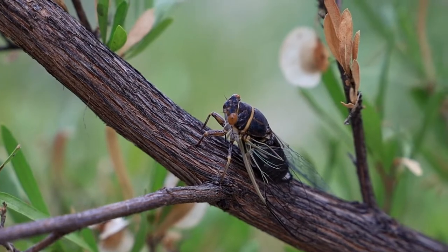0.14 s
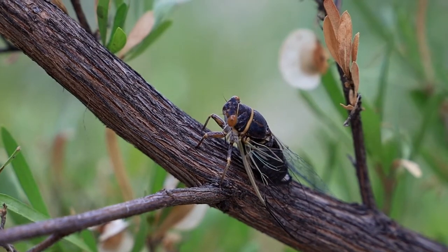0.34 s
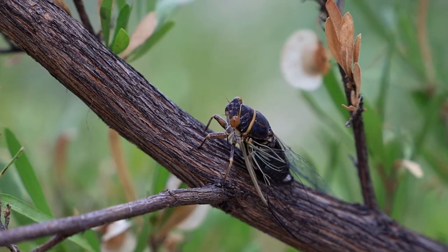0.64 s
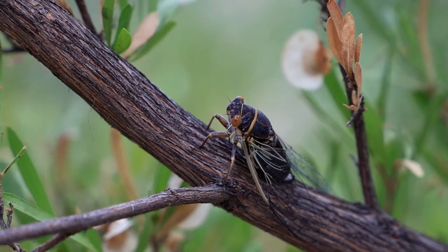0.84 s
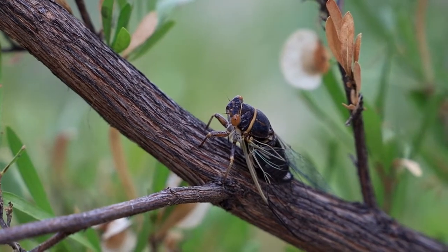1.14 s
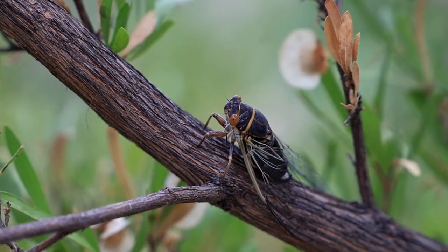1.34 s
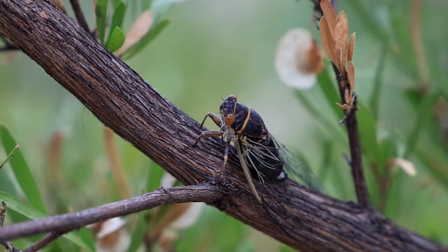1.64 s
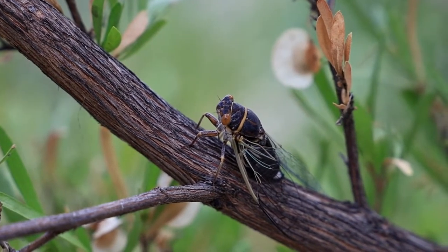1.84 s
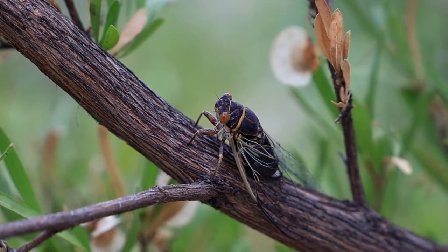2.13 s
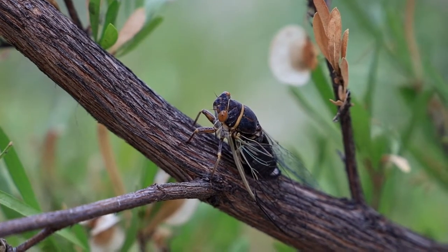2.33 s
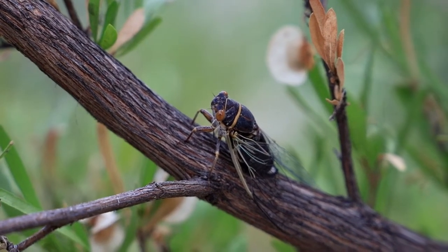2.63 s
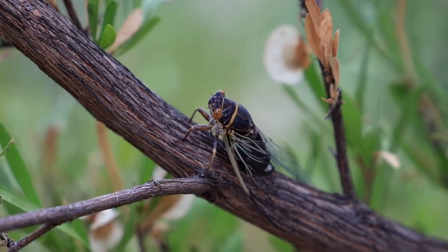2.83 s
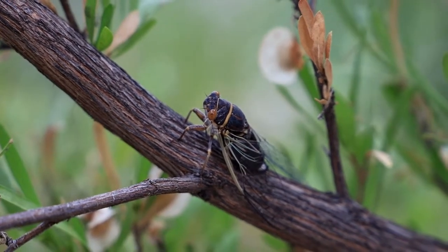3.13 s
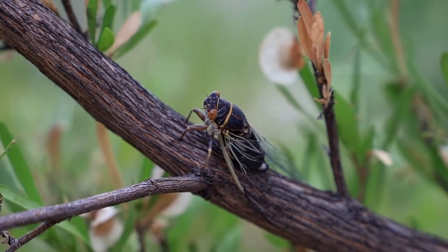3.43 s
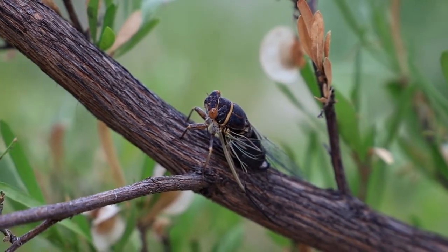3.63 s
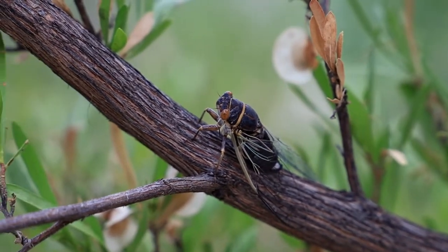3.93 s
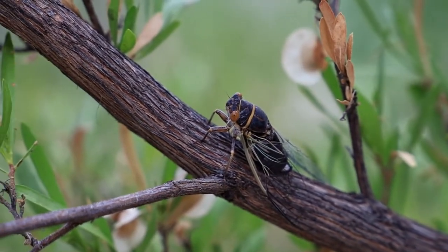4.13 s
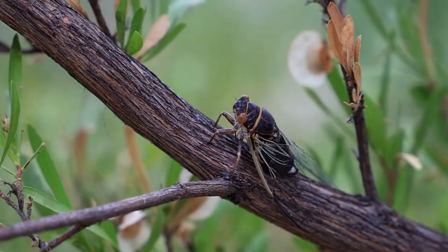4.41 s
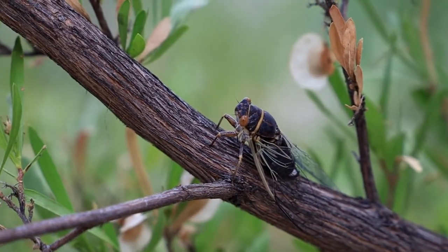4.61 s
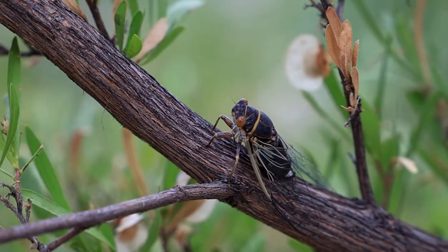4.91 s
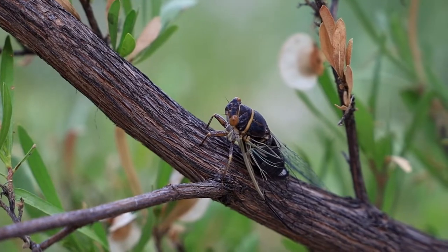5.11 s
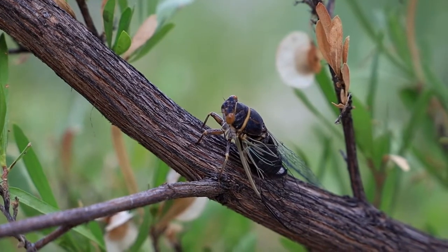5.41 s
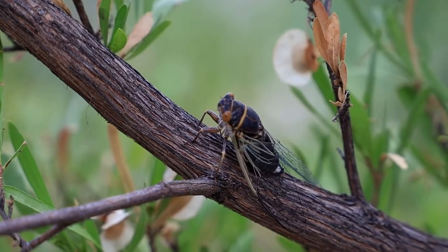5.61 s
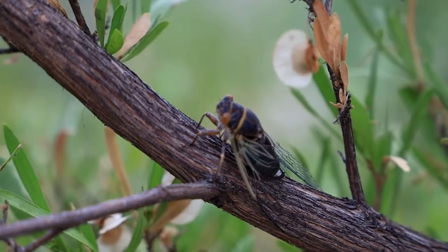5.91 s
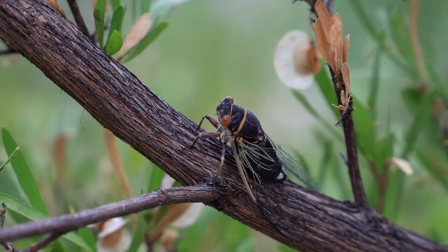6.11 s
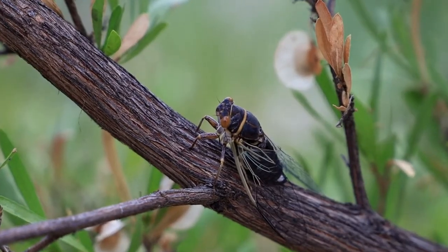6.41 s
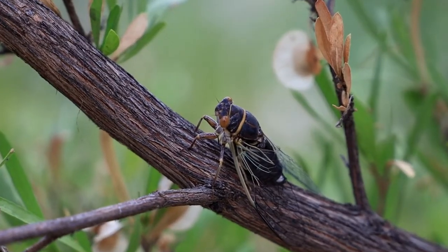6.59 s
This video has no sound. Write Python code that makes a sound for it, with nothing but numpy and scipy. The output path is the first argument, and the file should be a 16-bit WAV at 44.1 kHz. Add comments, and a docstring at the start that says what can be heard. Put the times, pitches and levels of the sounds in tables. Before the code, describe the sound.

Steady high-pitched cicada drone nearby, roughened by quickening ticks, drops to a softer dry rattle after four and a half seconds, then surges back very loud.

```python
"""Cicada among shrubs

A cicada sings close by: its tymbal, a ribbed drum skin, buckles about 157 times a second. Held taut it gives
one shrill snap a beat, with slack stutters that come ever faster. It relaxes into a lower, quieter rattle of
separate ribs, then tightens until the abdomen rings loudly. Each click is a sudden start with ringing resonances.
Leaves and twigs scatter the sound. Behind it: a faint second cicada, a soft rush, two dove coos, rumble and air.
"""
import sys
import numpy as np
from scipy import signal
from scipy.fft import rfft, irfft
from scipy.io import wavfile
from scipy.ndimage import uniform_filter1d

SR = 44100
rng = np.random.default_rng(int(sys.argv[2]) if len(sys.argv) > 2 else 0)


def digitize_waveform(pressure):
    """Quantize a signal to 16-bit integers and store it at the path in sys.argv[1].

    Rows of a 2-D input are taken as channels; values are limited to [-1, 1].
    """
    field = np.atleast_2d(pressure).T
    bounded = np.clip(field, -1, 1)
    quanta = np.round(bounded * 32767).astype(np.int16)
    wavfile.write(sys.argv[1], SR, quanta)


N = 297675
TIME = np.arange(N) / SR
MS = .001   # one millisecond in seconds
# the frequencies at which a short click is described
CLICK_HZ = np.arange(257) * SR / 512
# the moment at which the air sac, and the ribs with it, catches (s)
CATCH_S = 5.45

# Pace of the tymbal muscle, which slows as the tymbal relaxes. Each row: time in seconds, beats per second.
BEAT_RATE = [(0, 157.57), (2, 157.25), (3.6, 157.3), (4.35, 156.07), (4.6, 153.23), (4.75, 144.37),
             (4.9, 148.83), (6.1, 156.45), (6.75, 156.81)]
# Loudness of the taut song before its trim. Each row: time in seconds, level in dB.
TAUT_LEVEL = [(0.02, -36.5), (0.47, -36.5), (2.44, -36.5), (4.14, -36), (4.545, -37), (4.56, -43.5),
              (4.6, -42.5)]
# Ribs that buckle in turn on a slack beat. Each row: delay in ms before the span factor, then the level in dB
# relative to the beat when slack, after the catch and when tight, then a pitch factor.
RIB_ORDER = [(0, -0.5, 0.5, -11, 0.96), (.75, -7.5, -17, -39, 1), (1.721, -3.5, -3.5, -10, 0.914),
             (2.619, -3, -2.5, 1.5, 0.98), (3.3, -6, -13, -1.5, 0.878)]
# The gaps between the ribs close steadily. Each row: time in seconds, factor on the rib delays.
RIB_GAPS = [(4.65, 1.1), (5.0, 1.06), (5.35, .94), (5.45, .87), (5.55, .77), (5.75, .67), (6.0, .58),
            (6.25, .52), (6.6, .5)]


def taut_song(beat_s, level_db, uneven_db, waver):
    """One shrill snap a beat, each much like the last, and lone snaps after the tymbal has relaxed."""
    # Lone taut snaps. Each row: time in seconds, level in dB.
    stray_snaps = [(4.639, -38), (4.868, -46)]
    s = during(TAUT_LEVEL, beat_s)
    chance = rng.standard_normal((len(s), 2))
    db = at_time(TAUT_LEVEL, s)[0] + level_db + uneven_db * chance[:, 0]
    song = snaps(s, db, 1 + waver * chance[:, 1])
    stray_s, stray_db = np.transpose(stray_snaps)
    return song + snaps(stray_s, stray_db, np.ones(len(stray_s)))


def snaps(s, level_db, pitch):
    """Clicks of the taut tymbal: a broad crack with drifting resonances on top."""
    # Colour of the crack, before the pitch factor. Each row: frequency in Hz, relative level in dB.
    crack_colour = [(150, -44), (600, -42), (2200, -44.5), (3000, -92), (4200, -43), (5500, -40),
                    (7500, -19), (10000, -18), (12000, -39), (15800, -44.5)]
    # Resonances of the taut tymbal, which drift as it tires. Each row: Hz at first, Hz at last, width in Hz,
    # relative dB at first, dB at last, left-right balance in dB at first, at last.
    tymbal_modes = [(7180, 6955, 496, -1.7, -15, -6.5, -12.5), (7390, 7670, 310, 2, -9.5, 2.5, -6),
                    (8470, 8290, 470, 2, -7, 5, 1.5), (8680, 8840, 540, 4.5, -3, 3.5, 0),
                    (9040, 9440, 610, 7.5, -4, -2.5, -5.5), (9950, 10620, 540, 5.5, -4.5, 1.5, -2.5),
                    (11000, 9400, 460, -7, -20, 8.5, -1), (10820, 11760, 720, 2, -20.5, -5, -15),
                    (12040, 12400, 970, -10.5, -30, -10.5, -12), (14200, 14000, 1300, -17, -32, -2, -1)]
    # How much earlier the left side hears a snap. Each row: frequency in Hz, phase in radians.
    snap_lead = [(4000, 0), (5200, -1.5), (6300, -0.7), (7000, 1.38), (7800, 2.5), (8900, 0.93),
                 (10000, 1.69), (11400, 1.07), (12200, 3.5), (14200, 4.5), (15800, 7)]
    hz = CLICK_HZ / pitch[:, None]
    crack = from_db(at_hz(crack_colour, hz)) ** 2
    ringing = drifting(tymbal_modes, hz, s / TAUT_LEVEL[-1][0])
    return clicks(s, level_db, crack + ringing, snap_lead)


def stutters(level_db, span, scatter_ms):
    """Slack beats that break into the taut song, ever closer together."""
    # The stutters, before the small shift and the trim. Each row: time in seconds, level in dB.
    stutter_rows = [(0.1079, -38), (0.2288, -40.5), (0.364, -39.5), (0.491, -40.5), (0.622, -42.5),
                    (0.743, -41), (0.8615, -40), (0.9699, -39.5), (1.0824, -41.5), (1.1946, -42),
                    (1.3522, -42.5), (1.4486, -42), (1.5753, -41.5), (1.6904, -41.5), (1.818, -42.5),
                    (1.94, -42), (2.06, -41.5), (2.1552, -42), (2.2501, -40.5), (2.3575, -42),
                    (2.4596, -43), (2.5743, -41.5), (2.6953, -41), (2.798, -42.5), (2.8973, -42.5),
                    (2.9943, -41.5), (3.077, -42.5), (3.1595, -43), (3.249, -44), (3.3317, -43),
                    (3.413, -43), (3.49, -42.5), (3.5844, -42), (3.6625, -41.5), (3.7118, -45.5),
                    (3.7327, -47), (3.7833, -44), (3.8043, -45), (3.846, -45), (3.873, -43.5),
                    (3.894, -42.5), (3.9245, -46), (3.9364, -47), (3.9504, -45.5), (3.9777, -45),
                    (4.0002, -41.5), (4.0386, -44), (4.071, -42.5), (4.106, -43), (4.124, -45),
                    (4.143, -45), (4.169, -44.5), (4.1923, -43), (4.2073, -45), (4.223, -44), (4.251, -44),
                    (4.275, -42.5), (4.3091, -44), (4.3082, -44), (4.3395, -43), (4.3614, -46),
                    (4.383, -43.5), (4.4124, -42.5), (4.4278, -47), (4.439, -44), (4.462, -41),
                    (4.4907, -44), (4.5032, -44), (4.534, -42), (4.552, -41)]
    s, db = np.transpose(stutter_rows)
    # a stutter sounds lower than a rib of the steady rattle
    return rattle(s - 0.31 * MS, db + level_db, span, scatter_ms, uneven_db=1.5, waver=0.027, pitch=.95)


def slack_song(beat_s, level_db):
    """The rattle on every beat as the tymbal relaxes; the closing gaps sweep bands up through its spectrum."""
    # Loudness of the rattle, which takes over as the taut song ends. Each row: time in seconds, level in dB.
    slack_level = [(4.2, -55), (4.44, -52.5), (4.56, -49.5), (4.61, -46), (4.66, -44), (4.8, -43.5),
                   (5.0, -42), (5.3, -40.5), (5.55, -38.5), (5.8, -37), (6.0, -37.5), (6.2, -40.5),
                   (6.75, -40.5)]
    # The timing firms up as the play between the ribs dies away. Each row: time in seconds, scatter in ms
    # for a rib that is 1 ms late (it grows with the square root of the delay).
    rib_scatter = [(4.2, .08), (4.6, .045), (4.85, .026), (5.4, .021), (5.8, .016), (6.2, .01)]
    s = during(slack_level, beat_s)
    db = at_time(slack_level, s)[0] + level_db
    span = at_time(RIB_GAPS, s)[0]
    scatter_ms = at_time(rib_scatter, s)[0]
    return rattle(s, db, span, scatter_ms, uneven_db=1.2, waver=.004, pitch=rib_pitch_at(tension_at(s)))


def rattle(s, level_db, span, scatter_ms, uneven_db, waver, pitch):
    """On a slack beat the ribs give way one by one, each with a click of its own."""
    # Four times in seconds: the ribs pass from slack to caught between the first two, to tight between the last two.
    stages_s = [5.32, 5.422, 5.84, 6.1]
    out = 0
    for delay_ms, slack_db, caught_db, tight_db, rib_pitch in RIB_ORDER:
        chance = rng.standard_normal((len(s), 3))
        lag_s = (delay_ms * span + scatter_ms * np.sqrt(abs(delay_ms)) * chance[:, 0]) * MS
        stage_db = np.interp(s, stages_s, [slack_db, caught_db, caught_db, tight_db])
        db = level_db + stage_db + uneven_db * chance[:, 1]
        out = out + rib_clicks(s + lag_s, db, pitch * rib_pitch * (1 + waver * chance[:, 2]))
    return out


def rib_clicks(s, level_db, pitch):
    """Duller clicks of single slack ribs: tension tunes the resonances, and in part the body's own colour."""
    # Colour of the body, before the pitch factor. Each row: frequency in Hz, relative level in dB.
    rib_colour = [(150, -72), (1200, -64), (2800, -31), (3400, -29), (4000, -17.5), (5000, -13.5),
                  (7000, 1), (9500, -2), (10500, -10.5), (11700, -20.5), (12800, -19), (14000, -24.5),
                  (15800, -26)]
    # Resonances of a rib, before the pitch factor. Each row: centre in Hz, width in Hz, relative level in dB.
    rib_modes = [(6070, 770, -1), (6500, 980, -3.5), (8520, 460, 3.5)]
    # The side towards which the ribs sound. Each row: frequency in Hz, left-right balance in dB.
    rib_balance = [(3000, 1), (5600, -3.5), (6900, -4.5), (8040, 1.5), (9740, -1), (10500, -4),
                   (12740, -12), (15000, -8)]
    # How much earlier the left side hears a rib. Each row: frequency in Hz, phase in radians.
    rib_lead = [(3800, 0), (4600, -1.46), (6400, -0.6), (8000, -1.3), (8500, -1.5), (9300, -1.4),
                (10200, -2.5), (12700, -1.5), (15000, -1)]
    body_follows = 0.36   # the colour follows the pitch factor raised to this power
    body_mode, overtone = (8200, 430, 0.92), (12900, 1200, -15.5)   # centre Hz, width Hz, dB
    hz = CLICK_HZ / pitch[:, None]
    power = from_db(at_hz(rib_colour, CLICK_HZ / pitch[:, None] ** body_follows)) ** 2
    power = power + sum(resonance(hz, *mode) for mode in rib_modes)
    # one body resonance stays put; the overtone speaks only after the catch
    power = power + resonance(CLICK_HZ, *body_mode)
    power = power + (s > CATCH_S)[:, None] * resonance(CLICK_HZ, *overtone)
    sides = panned(at_hz(rib_balance, CLICK_HZ))[:, None]
    return clicks(s, level_db, power * sides, rib_lead)


def tension_at(s):
    """The tymbal tightens at an even pace: 0 while it is slack, 1 once it is tight again."""
    start_s, length_s = 5.13, 1.36
    return np.clip((s - start_s) / length_s, 0, 1)


def rib_pitch_at(tension):
    """Tension raises the pitch of the ribs by up to 17 percent, gently at first, then faster."""
    return 1 + 0.17 * tension ** 2.2


def abdomen(beat_s, level_db, uneven_db, lag_ms):
    """As the air sac comes into tune, each beat rings it; the last ribs follow ever closer behind."""
    # Loudness of the ringing before its trim. Each row: time in seconds, level in dB.
    swell = [(5.33, -54), (5.45, -47), (5.55, -54), (5.83, -38.5), (5.88, -33), (6.0, -31.5), (6.04, -27.5),
             (6.3, -25.5), (6.75, -25)]
    # Broad colour under the resonances. Each row: frequency in Hz, relative level in dB.
    ring_colour = [(150, -62), (320, -41), (1000, -61), (3000, -56), (3800, -37.5), (5000, -42),
                   (7000, -36), (9000, -23), (11000, -31), (15800, -39.5)]
    # Resonances of the abdomen, which climb as it comes into tune. Each row: Hz at first, Hz at last, width in Hz,
    # relative dB at first, dB at last, left-right balance in dB at first, at last.
    abdomen_modes = [(3620, 4880, 320, -33, -20, -10, -6), (6000, 6490, 460, -4.5, -12, -11, -4.5),
                     (6200, 7590.0, 1150, -6.7, -15.5, -1, 0), (7700, 8220, 820, 3, 3, -0.1, 2.5),
                     (8250, 8530, 830, -6, -2.5, -2, -9.5), (9360, 11000, 250, -1, -9, 3, 13),
                     (9450, 10620, 570, -14, -10, 9, -5), (12900, 13300, 1400, -33, -27.5, -16, -3)]
    # It comes into tune between these two times, in seconds.
    tuning_s = [5.78, 6.54]
    # How much earlier the left side hears the ringing. Each row: frequency in Hz, phase in radians.
    ring_lead = [(4500, 0), (5700, 0), (6500, 0.5), (8000, -1.48), (8550, -1.47), (8900, -0.6),
                 (9800, -1.6), (10200, -3), (12500, -2), (15000, -8.5)]
    # the sac catches for a moment before it is in tune: louder, and higher by a share
    catch_width_s, catch_db, catch_rise = 0.015, 4, .17
    # as it comes into tune, every other beat is stronger at first
    flutter_s, flutter_width_s, flutter_db = 5.95, .11, 3.0
    # the last two ribs ring it again, more weakly
    rebound_db = -19.5
    # the whole abdomen also thumps, harder as tension rises: (centre Hz, width Hz, dB when tight)
    thump, thump_slack_db = (120, 210, -35), -24
    # a dull crack, now weak, now strong: (centre Hz, width Hz, typical dB)
    crack, crack_spread_db = (1000, 8000, -46.5), 4

    s = during(swell, beat_s)
    tension = tension_at(s)
    catch = bump(s, CATCH_S, catch_width_s)
    flutter = flutter_db * bump(s, flutter_s, flutter_width_s) * (-1) ** np.arange(len(s))
    uneven = uneven_db * rng.standard_normal(len(s))
    db = at_time(swell, s)[0] + level_db + catch_db * catch + flutter + uneven

    hz = CLICK_HZ / (1 + catch_rise * catch[:, None])
    power = drifting(abdomen_modes, hz, np.interp(s, tuning_s, [0, 1]))
    # a repeat that follows closely puts ripples into the spectrum
    span = at_time(RIB_GAPS, s)[0][:, None]
    rebounds = sum(np.exp(-2j * np.pi * CLICK_HZ * rib[0] * span * MS) for rib in RIB_ORDER[-2:])
    power = power * abs(1 + from_db(rebound_db) * rebounds) ** 2
    power = power + from_db(at_hz(ring_colour, CLICK_HZ)) ** 2
    thump_gain = from_db(thump_slack_db * (1 - tension[:, None]))
    power = power + resonance(CLICK_HZ, *thump) * thump_gain ** 2
    crack_gain = from_db(crack_spread_db * rng.standard_normal((len(s), 1)))
    power = power + resonance(CLICK_HZ, *crack) * crack_gain ** 2
    return clicks(s + lag_ms * MS, db, power, ring_lead)


def beats(start_phase, scatter_ms):
    """Times at which the muscle pulls: each whole turn of its running beat count, with slight scatter."""
    turns = start_phase + np.cumsum(at_time(BEAT_RATE, TIME)[0]) / SR
    s = np.interp(np.arange(1, int(turns[-1]) + 1), turns, TIME)
    return s + scatter_ms * rng.standard_normal(len(s)) * MS


def clicks(s, level_db, power, lead):
    """Stereo clicks, each with its own power spectrum a side; level is the rms of a train at the first beat rate."""
    # The higher resonances take a little longer to speak. Each row: frequency in Hz, delay in ms.
    speak = [(5000, 0.03), (8000, 0.01), (10500, 0.25), (15000, 0.8)]
    size, lead_in = 2 * (len(CLICK_HZ) - 1), 20   # samples
    train_power = power.mean(axis=(0, 2))[:, None]
    gain = np.sqrt(power * SR / BEAT_RATE[0][1] / train_power) * from_db(level_db)[:, None]
    # whole samples place the click; the part left over becomes a phase shift
    start, part = np.divmod(np.maximum(s * SR - lead_in, 0), 1)
    where = (start.astype(int)[:, None] + np.arange(size)).ravel()
    turns = CLICK_HZ / SR * (part[:, None] + lead_in)
    turns = turns + np.cumsum(abs(at_hz(speak, CLICK_HZ))) * MS * CLICK_HZ[1]
    # minimum phase: a sudden start, then each resonance rings out
    cepstrum = irfft(np.log(power.mean(axis=0)))
    cepstrum[:, size // 2:] = 0
    phase = rfft(cepstrum).imag - 2 * np.pi * turns
    apart = at_hz(lead, CLICK_HZ) / 2
    out = []
    for side, shift in zip(gain, (apart, -apart)):
        waves = irfft(side * np.exp(1j * (phase + shift)))
        out.append(np.bincount(where, waves.ravel(), N)[:N])
    return np.array(out)


def drifting(modes, hz, along):
    """Left and right power of resonances on their way from a first state (0) to a last (1); top 1."""
    along, power = along[:, None], 0
    for first_hz, last_hz, width_hz, first_db, last_db, first_pan_db, last_pan_db in modes:
        centre_hz = first_hz + along * (last_hz - first_hz)
        mode = resonance(hz, centre_hz, width_hz, first_db + along * (last_db - first_db))
        power = power + mode * panned(first_pan_db + along * (last_pan_db - first_pan_db))
    return power / power.mean(axis=0).max(axis=1, keepdims=True)


def resonance(hz, centre_hz, width_hz, db):
    """Power response of a steep-sided resonance."""
    return (from_db(db) / (1 + (2 * (hz - centre_hz) / width_hz) ** 2)) ** 2


def panned(balance_db):
    """Factors on the power for left and right."""
    return np.array([from_db(balance_db), from_db(-balance_db)])


def foliage(x, t60, alike, sway_per_s, size=8192, count=6):
    """Leaves and twigs send back a short, dense spray of treble echoes; it shifts as the shrubs sway."""
    s = np.arange(size) / SR
    # leaves are too small to send back sounds lower than this (Hz)
    leaf_low_hz = 2130
    treble = signal.sosfilt(signal.butter(2, leaf_low_hz, "high", fs=SR, output="sos"), x)
    # the sway mixes several sprays in slowly changing shares of steady total power
    sway = rng.standard_normal((count, 200))
    shares = np.array([np.interp(TIME * sway_per_s, np.arange(len(row)), row) for row in sway])
    shares = shares / np.sqrt(np.sum(shares ** 2, axis=0))
    out = 0
    for share in shares:
        # fades by 60 dB in t60 seconds; nothing comes back in the first millisecond
        echoes = two_sides(alike, size) * from_db(-60 * s / t60) * (s > .001)
        echoes /= np.sqrt(np.sum(echoes ** 2, axis=1, keepdims=True))
        out = out + share * signal.oaconvolve(treble[None], echoes, axes=1)[:, :N]
    return out


def neighbour():
    """A second, faint buzz farther off: rib clicks at a higher pitch, on an even beat of their own."""
    beats_per_s, level_db, pitch = 155.0, -53, 1.3
    s = np.arange(0, TIME[-1], 1 / beats_per_s)
    return rib_clicks(s, np.full(len(s), level_db), np.full(len(s), pitch))


def rush(song, throb):
    """A soft rush of noise that sets in with the loudest song and throbs with its strongest beats."""
    # Colour of the rush. Each row: frequency in Hz, relative level per Hz in dB.
    rush_colour = [(25, 3), (150, 4.5), (500, 3), (2000, 3.5), (3500, 7), (6000, 11.5), (16000, 2.5)]
    halfway_s, rise_s = 5.935, 0.097
    strength = np.sqrt(uniform_filter1d(song[0] ** 2, size=40).clip(0))
    rise = 1 / (1 + np.exp((halfway_s - TIME) / rise_s))
    beating = 1.2 + throb * strength / strength.max()
    return from_db(-54.5) * rise * beating * noise(rush_colour, alike=0.47)


def dove():
    """A dove far away: two soft rising coos, nearly pure tones."""
    # Each row: start in seconds, length in seconds, first pitch in Hz, last pitch in Hz, level in dB at the middle.
    coos = [(4.794, .12, 573, 628, -85), (5.055, 0.11, 600, 761, -77)]
    out = 0
    for s, length_s, first_hz, last_hz, db in coos:
        along = np.clip((TIME - s) / length_s, 0, 1)
        hz = first_hz + (last_hz - first_hz) * along
        tone = np.sqrt(2) * np.sin(2 * np.pi * np.cumsum(hz) / SR)   # rms 1
        out = out + from_db(db) * np.sin(np.pi * along) ** 2 * tone
    return out


def rumble():
    """A far, low rumble: filtered noise with a steady bed that swells now and then."""
    # Colour of the rumble. Each row: frequency in Hz, relative level per Hz in dB.
    rumble_colour = [(120, -42), (230, -13.5), (320, -7), (420, -17.5), (700, -21.5), (2000, -34)]
    # Swells on top of the bed. Each row: centre in seconds, half-length in seconds, added level in dB.
    swells = [(1.6, 0.26, -77), (3.3, .2, -83), (4.4, 0.19, -74), (4.74, .08, -80)]
    gain = from_db(-86)
    for s, width_s, db in swells:
        gain = gain + from_db(db) * bump(TIME, s, width_s)
    return gain * noise(rumble_colour, alike=0.56)


def outdoor_air(level_db):
    """The quiet outdoors: steady coloured noise, nearly the same on both sides."""
    # Colour of the air. Each row: frequency in Hz, relative level per Hz in dB.
    air_colour = [(25, -43), (60, -1.5), (150, -4), (300, -5), (600, -6), (1500, -9), (3000, -9),
                  (8000, 5.5), (16000, -31)]
    return from_db(level_db) * noise(air_colour, alike=0.88)


def noise(colour, alike):
    """Stereo noise of rms 1, coloured by scaling each frequency of white noise."""
    hz = np.arange(N // 2 + 1) * SR / N
    x = irfft(rfft(two_sides(alike, N)) * from_db(at_hz(colour, hz)), N)
    return x / x.std()


def two_sides(alike, size):
    """White noise for two ears, partly shared."""
    mid, side = rng.standard_normal((2, size))
    alike = np.clip(alike, 0, 1)
    return np.sqrt(1 + alike) * mid + np.sqrt(1 - alike) * side * np.array([[1], [-1]])


def bump(s, centre_s, width_s):
    """A smooth rise to 1 and fall again."""
    return np.exp(-((s - centre_s) / width_s) ** 2)


def from_db(db):
    """Decibels to gain."""
    return 10 ** (np.asarray(db) / 20)


def at_time(rows, s):
    """Every column of a curve at the given times."""
    knots, *columns = np.transpose(rows)
    return [np.interp(s, knots, c) for c in columns]


def at_hz(points, hz):
    """A spectrum read on a log-frequency axis."""
    knots, values = np.transpose(points)
    return np.interp(np.log(np.maximum(hz, 1)), np.log(knots), values)


def during(rows, s):
    """Those times that lie within a curve; one that begins at the very start holds from there."""
    begin = rows[0][0] if rows[0][0] > .1 else 0
    return s[(s >= begin) & (s <= rows[-1][0])]


def scene():
    """The taut, slack and ringing song with its stutters, the echoes and the quiet outdoors."""
    beat_s = beats(start_phase=.377, scatter_ms=0.03)
    shrill = taut_song(beat_s, level_db=1.5, uneven_db=.5, waver=0.0026)
    low = slack_song(beat_s, level_db=0.0)
    ticks = stutters(level_db=-2.35, span=.85, scatter_ms=0.2485)
    loud = abdomen(beat_s, level_db=-0.86, uneven_db=1.0, lag_ms=0.083)
    far = neighbour()
    # each manner of song reaches the leaves at its own level
    scattered = from_db(-5.5) * shrill + from_db(-8) * low + from_db(-9) * ticks
    scattered = scattered + from_db(-15.0) * loud + from_db(-3) * far
    echoes = foliage(scattered.mean(axis=0), t60=0.073, alike=0.21, sway_per_s=2.01)
    cicadas = shrill + low + ticks + loud + far + echoes
    background = rush(loud, throb=1.7) + dove() + rumble() + outdoor_air(level_db=-64.0)
    return cicadas + background


def record(dry):
    """A steep low-pass filter cuts the top above 15.9 kHz."""
    return signal.sosfilt(signal.ellip(10, .1, 80, 15900, fs=SR, output="sos"), dry)


dry = scene()
out = record(dry)
digitize_waveform(out)
```